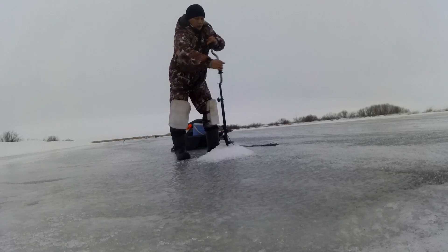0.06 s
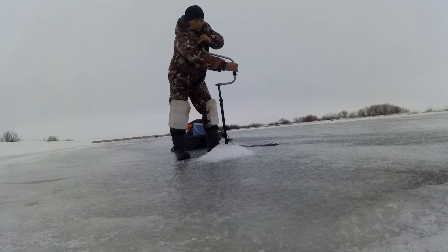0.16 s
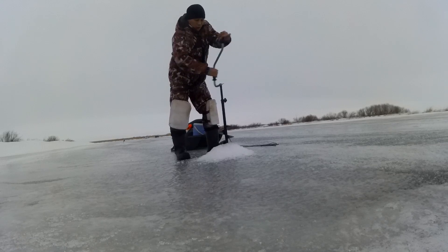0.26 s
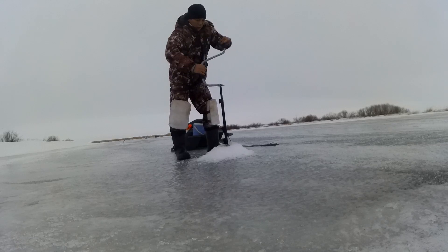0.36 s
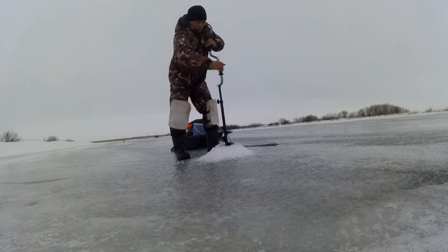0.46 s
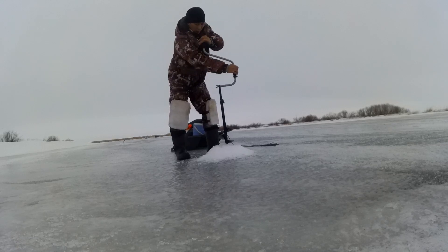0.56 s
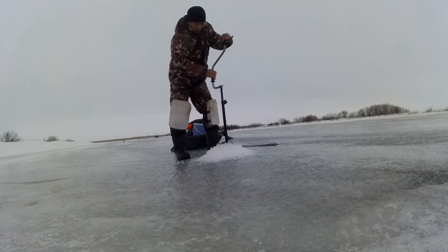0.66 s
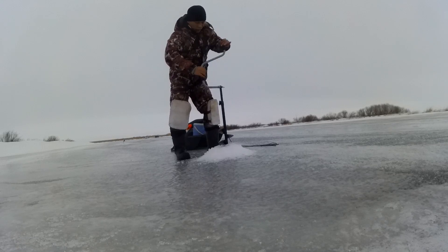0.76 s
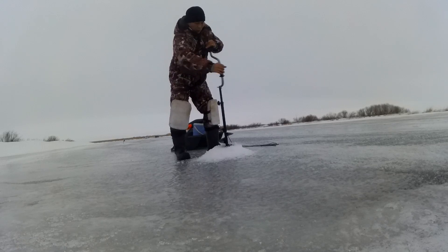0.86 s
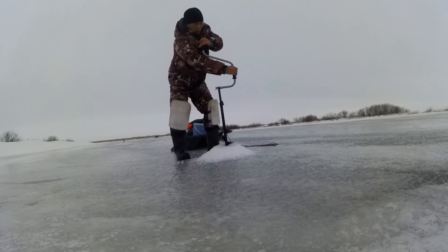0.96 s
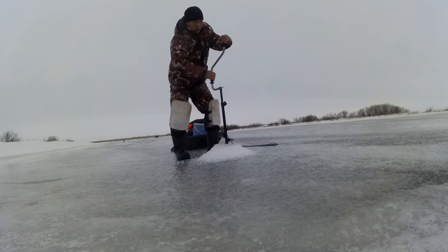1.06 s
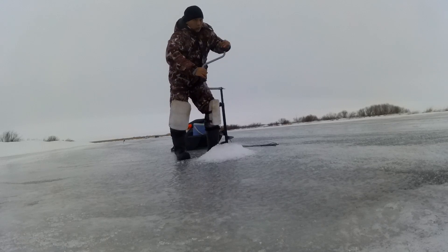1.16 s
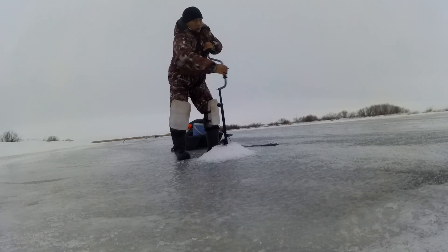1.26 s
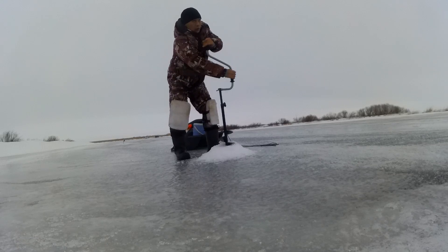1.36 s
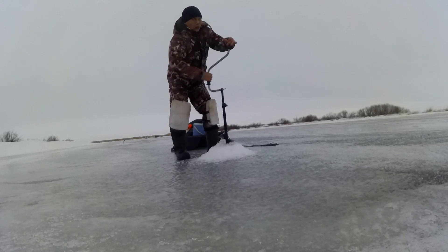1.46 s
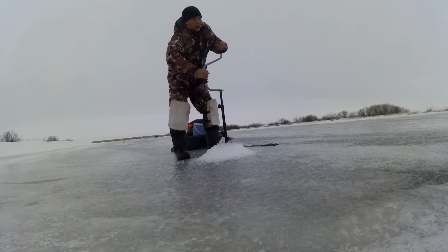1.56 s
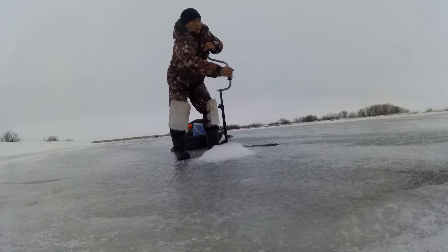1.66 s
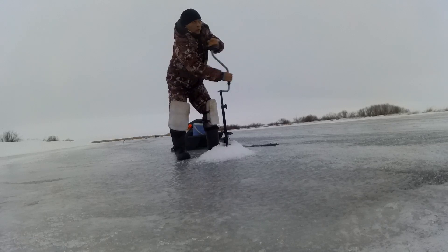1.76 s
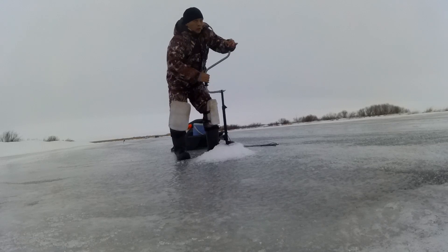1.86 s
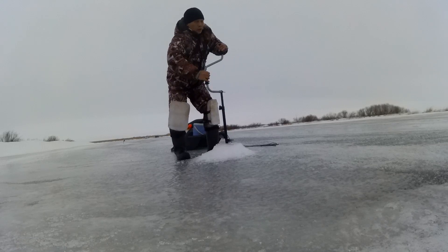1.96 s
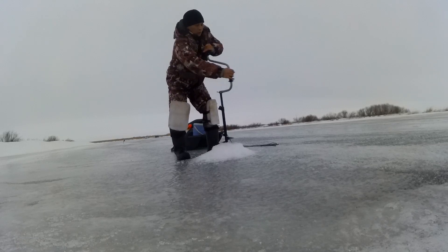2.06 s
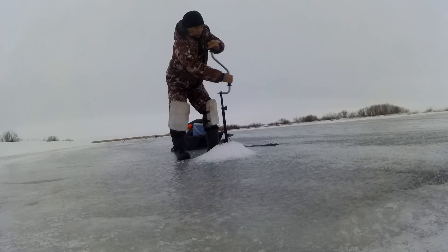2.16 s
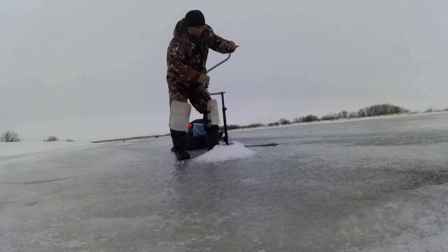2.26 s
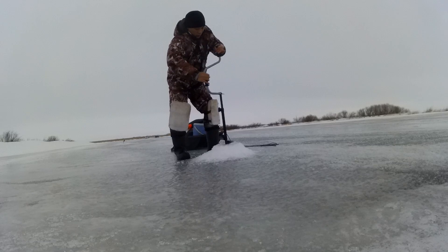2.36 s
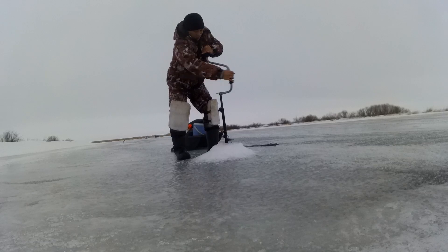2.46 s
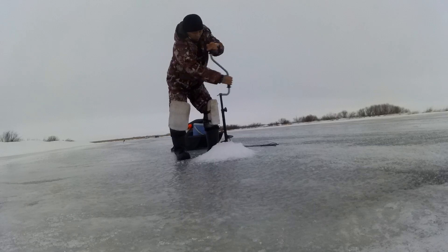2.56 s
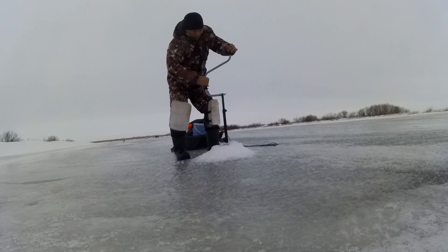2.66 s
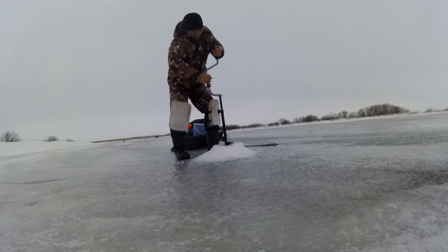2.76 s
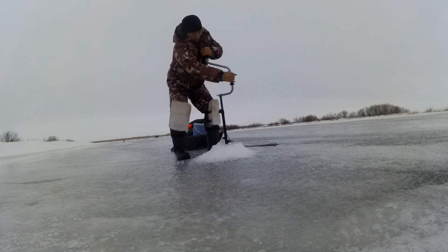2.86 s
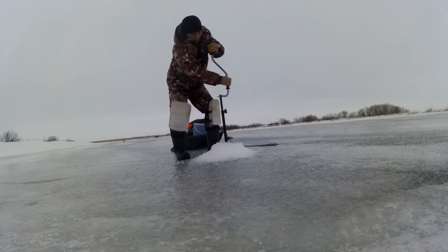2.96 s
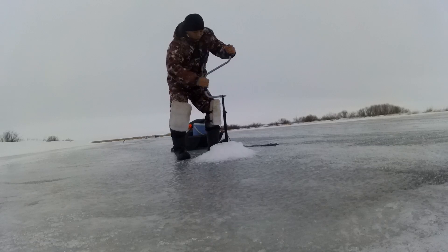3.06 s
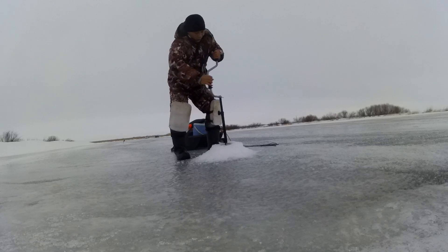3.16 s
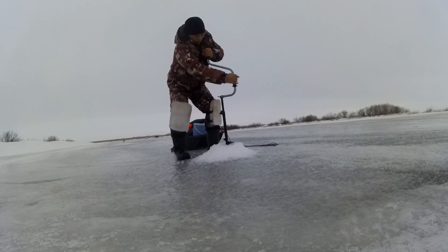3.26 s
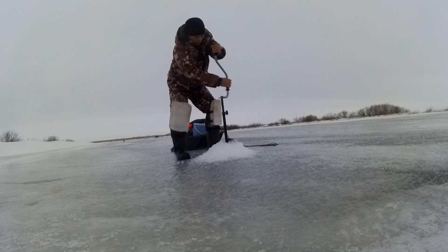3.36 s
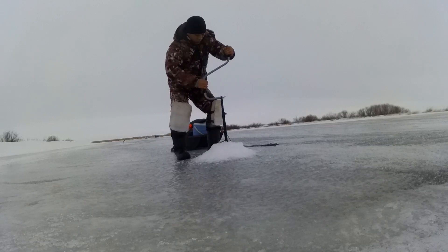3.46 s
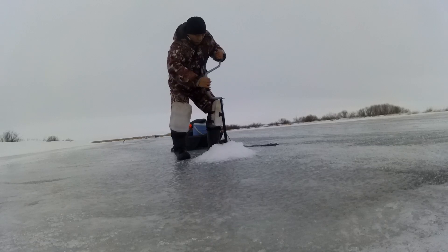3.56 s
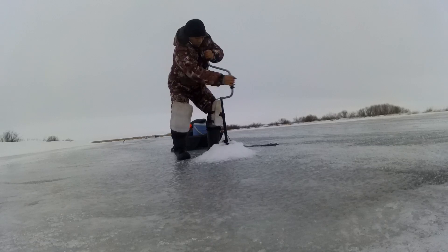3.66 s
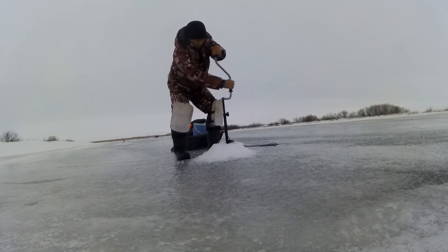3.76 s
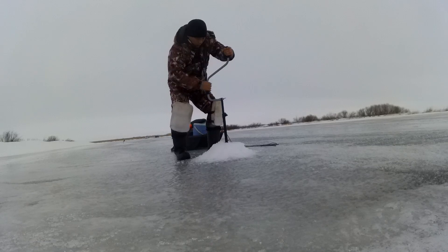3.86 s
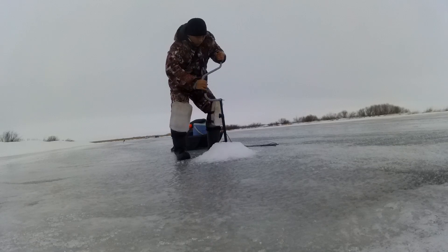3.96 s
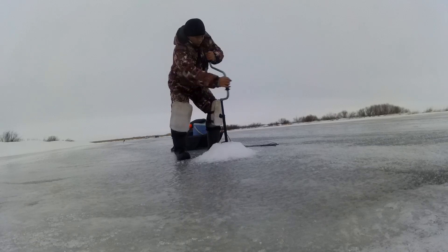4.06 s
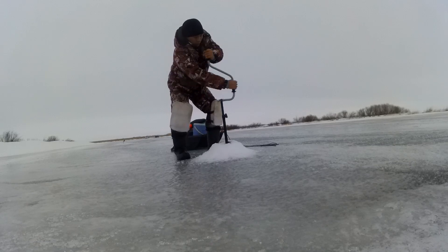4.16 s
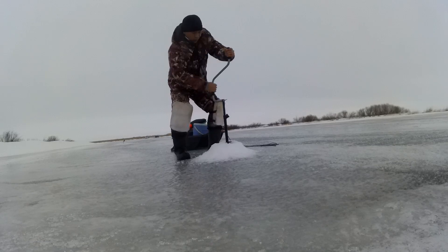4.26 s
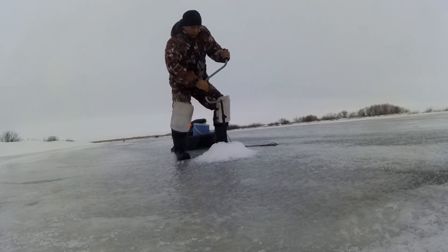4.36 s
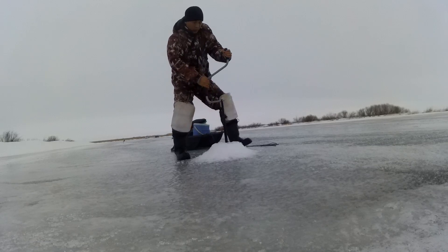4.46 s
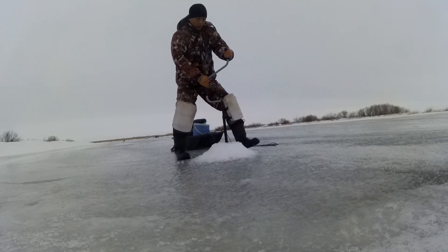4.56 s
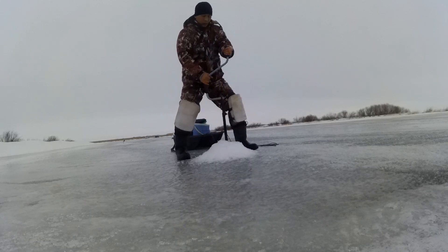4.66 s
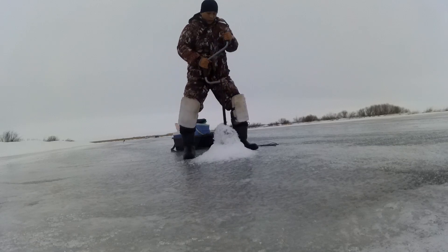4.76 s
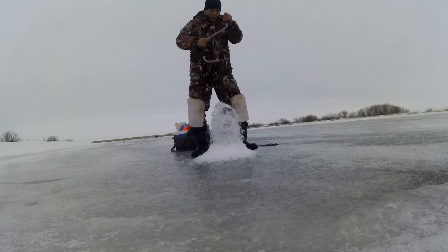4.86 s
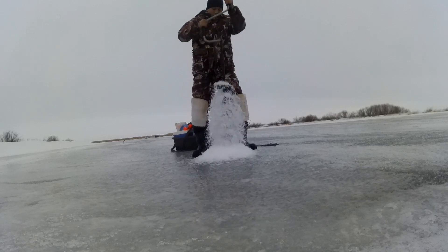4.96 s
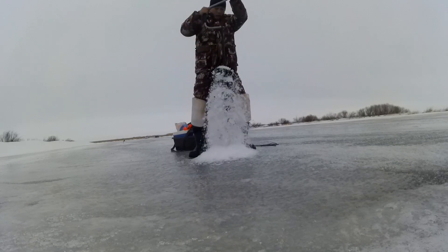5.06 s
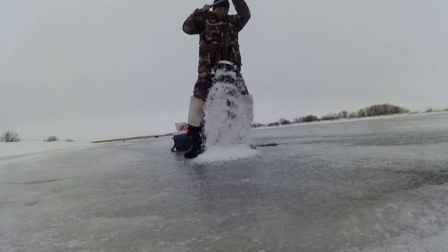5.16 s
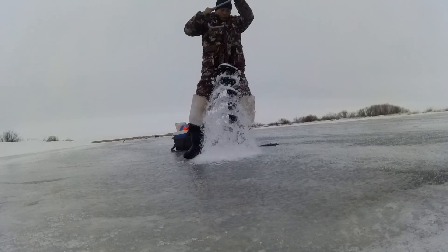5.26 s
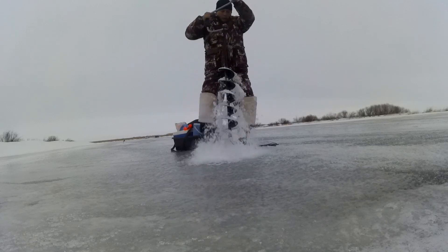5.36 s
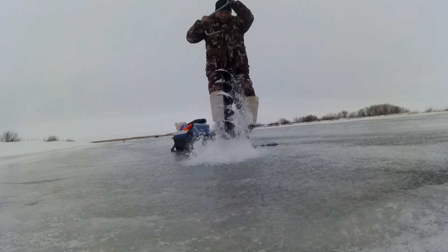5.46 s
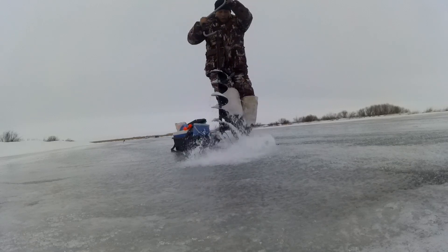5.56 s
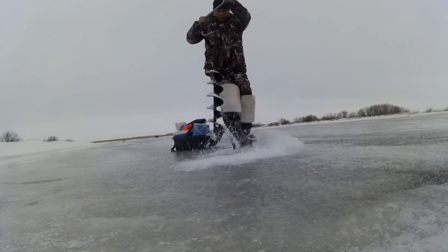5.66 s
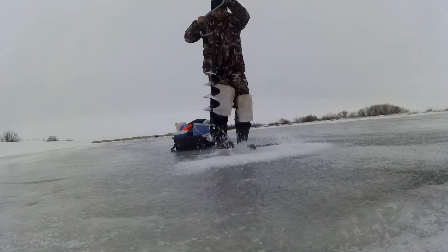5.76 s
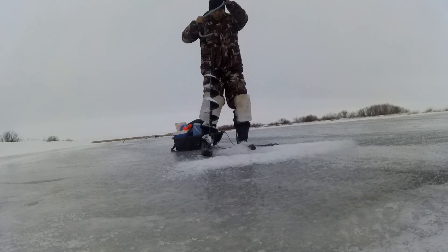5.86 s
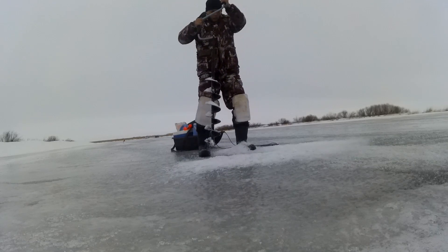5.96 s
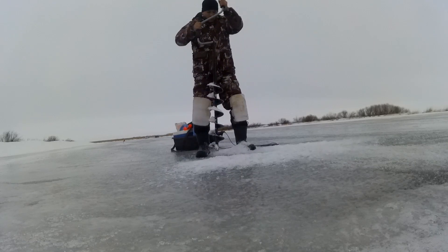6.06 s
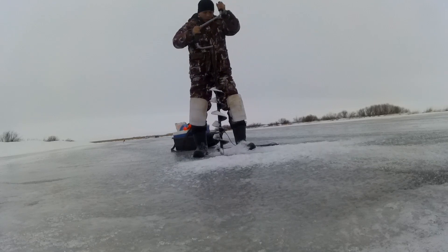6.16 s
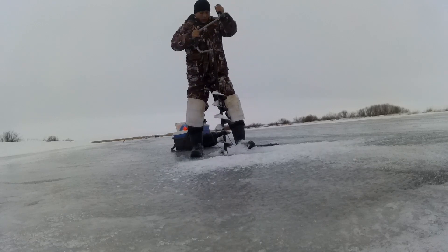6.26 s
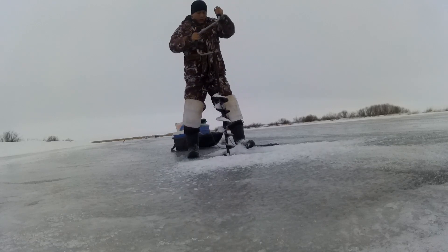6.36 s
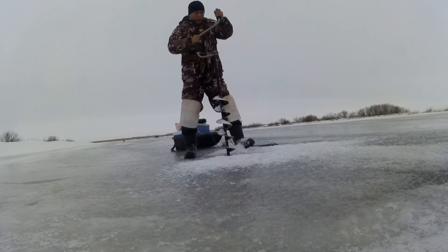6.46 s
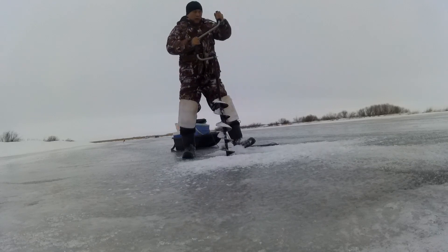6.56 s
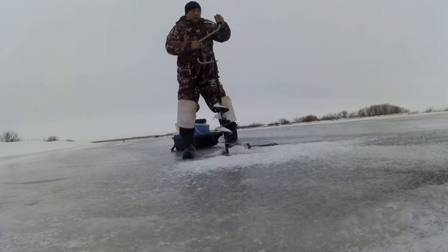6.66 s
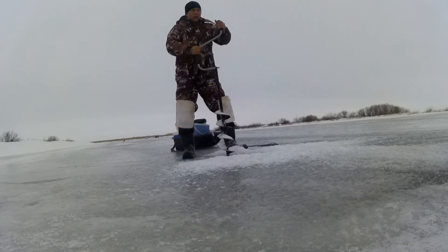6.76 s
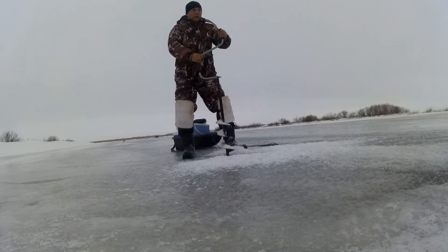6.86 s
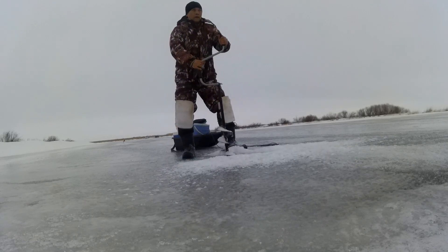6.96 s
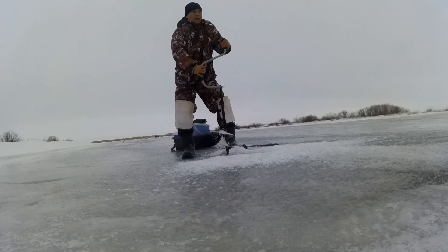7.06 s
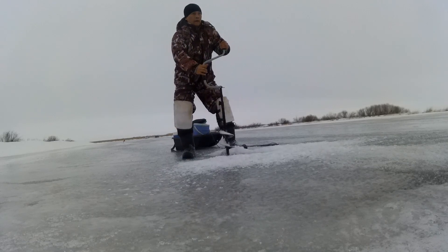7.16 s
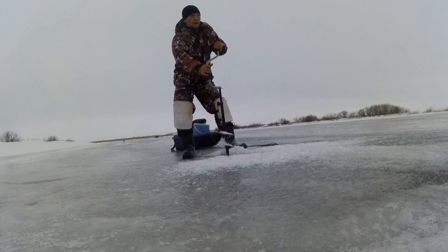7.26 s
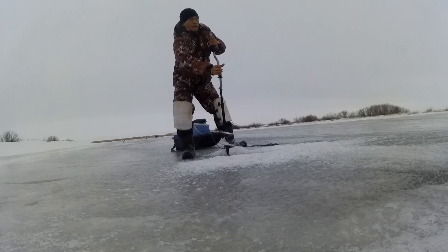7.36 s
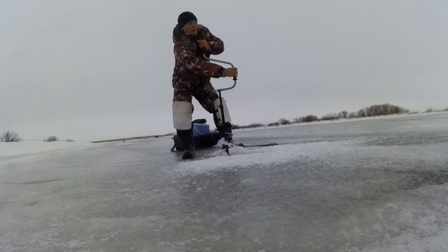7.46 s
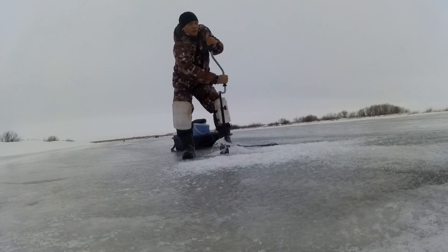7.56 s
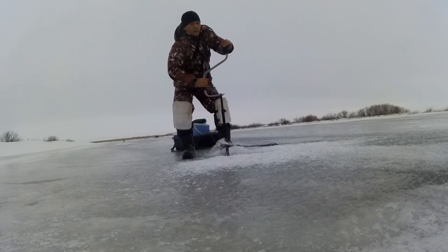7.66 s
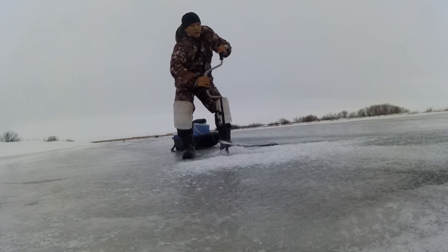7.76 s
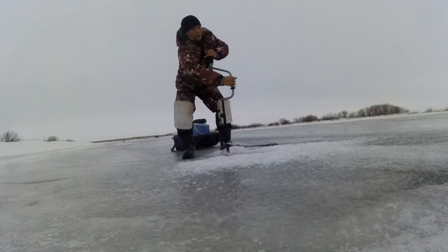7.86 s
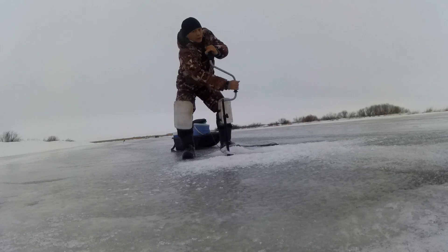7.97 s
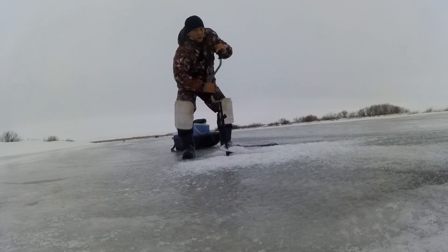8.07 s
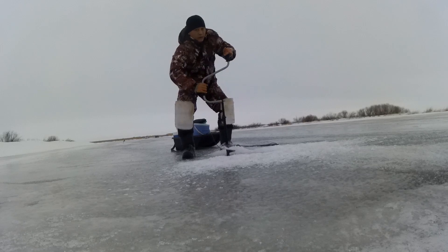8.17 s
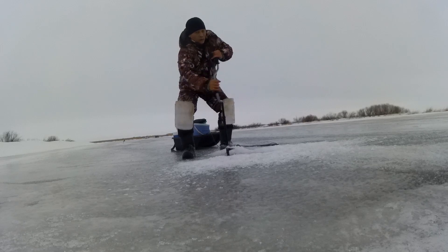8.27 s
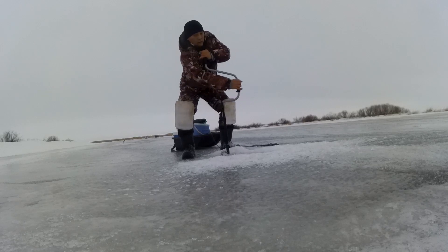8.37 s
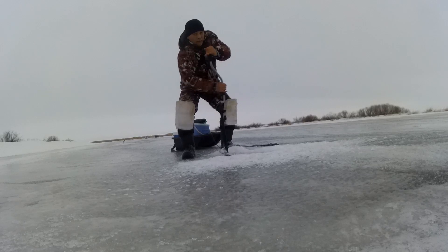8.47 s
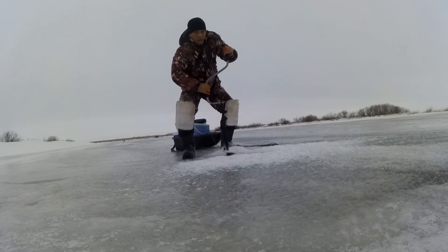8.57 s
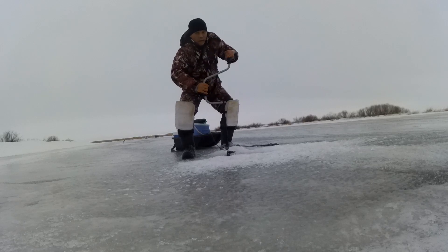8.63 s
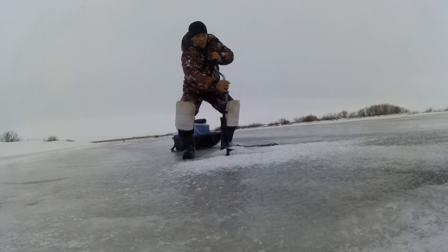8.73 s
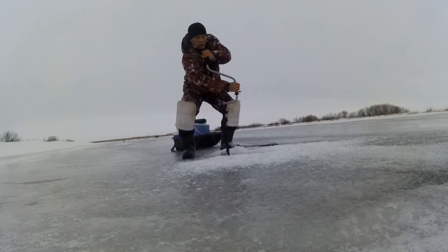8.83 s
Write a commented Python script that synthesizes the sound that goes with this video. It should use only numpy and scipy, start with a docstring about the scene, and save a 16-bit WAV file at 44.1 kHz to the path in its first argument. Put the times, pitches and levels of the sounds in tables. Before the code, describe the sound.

The microphone lies on a frozen lake, so the ice carries most of the sound. From 0 to 4.4 s a hand auger grinds steadily: a dull, wavering ring around 530 Hz, low rumble and gritty crunch, swelling with each push roughly every 0.4 s, broken by irregular bites, with faint crackling chips and a few tiny early squeaks. It stops abruptly; a soft knock, then at 4.7 s a sharper knock and tick, and a rasping drag up the hole until 5 s. From 5.2 to 5.7 s slush drops in wet lumps, hollow thuds and fine fizz, thinning to crumbs and drips. Around 6.7 s a boot thuds and crunches. At 6.95 s blades skid with a brief metallic chatter. Sparse scratches follow from 7.4 s; a short rising squeal at 8.2 s, then ringing, biting grinding builds strongly to the end, about 8.9 s.

```python
"""A hand auger grinds through lake ice, dull and ringing near 530 Hz, because the microphone lies on the sheet.
It is pulled out and sheds its slush; a boot shifts, the blades are set down, skid and bite again.
Brittle clicks driven through resonances and colour filters make the cutting and scraping;
short waves and noise pulses make the knocks, bites and splinters.
Only a faint crackle of chips and spray comes through the air."""
import sys
import numpy as np
from scipy import signal
from scipy.fft import rfft, irfft
from scipy.io import wavfile
from scipy.ndimage import uniform_filter1d, map_coordinates

SR = 44100
rng = np.random.default_rng(int(sys.argv[2]) if len(sys.argv) > 2 else 0)


def generate_wav(signal):
    """Clip the signal to [-1, 1] and save it as 16-bit WAV at the path in sys.argv[1]."""
    frames = np.transpose(np.atleast_2d(signal))
    scaled = np.clip(frames, -1, 1) * 32767
    pcm = np.round(scaled).astype(np.int16)
    wavfile.write(sys.argv[1], SR, pcm)


N = 392445

# ice chips crackling in the air: [f/Hz, level/dB]
CHIP_COLOUR = [(1800, 1), (2300, 0), (2900, -4), (3500, -3.5), (4500, -1), (5050, -7.5), (5400, -0.5),
               (6300, -3), (6750, -10.5), (7250, -6), (8300, -20), (14000, -19.5)]
# wet crust breaking: [f/Hz, level/dB]
CRUST_COLOUR = [(800, -12.5), (1120, -5.5), (1280, 5.5), (1450, -3.5), (1700, -1.5), (1900, -12),
                (2160, -29.5), (5000, -40), (6500, -61)]
# the steel catches and breaks off a larger flake: [t/s of the peak, level/dB, rise/s, ring f/Hz, crunch level/dB]
BITES = [(.027, -25, 0.0037, 537, -43), (.144, -18, 0.0059, 532, -41.5), (.28, -26.5, 0.0077, 537, -45),
         (.337, -22, .003, 523, -46), (.517, -24.5, 0.0067, 528, -53), (.55, -24, 0.0033, 525, -51),
         (.725, -21.5, 0.0044, 522, -49), (.929, -20, 0.0023, 560, -44), (1.159, -22, 0.0044, 536, -54),
         (1.328, -24.5, 0.0025, 557, -46), (1.415, -24, 0.0044, 553, -38), (1.456, -21.5, .0025, 544, -45),
         (1.5, -25.5, 0.007, 534, -44), (1.606, -29, 0.0028, 534, -40), (1.69, -24, 0.0017, 563, -48),
         (1.977, -19.5, 0.0038, 535, -49), (1.732, -20, 0.00089, 510, -49),
         (1.820, -20.5, 0.0017, 560, -42.5), (2.072, -27, 0.0025, 550, -42.5),
         (2.271, -21, .0045, 543, -49), (2.443, -22, .002, 567, -45), (2.525, -28, 0.0029, 523, -42),
         (2.550, -19.5, 0.002, 550, -41), (2.630, -22, 0.002, 560, -39), (2.589, -19, .003, 560, -48),
         (2.756, -17, 0.0017, 530, -51), (2.877, -19.5, 0.0013, 483, -40.5),
         (3.074, -18.5, 0.0043, 526, -52), (3.109, -24, 0.0037, 535, -53), (3.197, -20.5, 0.0026, 536, -46),
         (3.268, -22, 0.0074, 552, -41), (3.289, -17.5, .0045, 534, -50), (3.677, -19.5, 0.0015, 520, -43),
         (3.857, -20, 0.0019, 540, -45), (3.869, -17, 0.0058, 534, -46), (3.904, -19.5, 0.0016, 516, -51),
         (4.113, -21.5, 0.004, 536, -47), (4.256, -20, 0.0024, 510, -52), (4.301, -17, 0.0021, 531, -42),
         (4.755, -31, 0.001, 616, -61), (4.768, -32, 0.0028, 482, -58), (4.799, -29, 0.0011, 601, -55),
         (4.815, -26, 0.00067, 559, -46), (4.833, -28, 0.0022, 603, -43), (4.844, -26.5, 0.00066, 624, -43),
         (4.854, -26, 0.0014, 620, -40), (4.864, -35, 0.0012, 585, -36), (4.885, -17, 0.0017, 556, -35),
         (4.890, -20.5, 0.0017, 700, -32), (4.898, -18.5, 0.00093, 624, -34),
         (4.909, -25, 0.0015, 671, -45), (4.952, -24.5, 0.002, 574, -35.5),
         (6.933, -31.5, 0.0055, 554, -61), (6.963, -24, 0.0038, 540, -35.5), (6.985, -26, 0.0015, 573, -40),
         (7.009, -24, 0.0017, 584, -38), (7.033, -23.5, 0.0037, 554, -46),
         (7.064, -23.5, 0.0016, 556, -45.5), (7.080, -26, 0.0043, 526, -58), (7.107, -39, 0.0024, 581, -61),
         (7.126, -38, 0.0027, 592, -59), (7.152, -35.5, 0.0016, 620, -57), (7.618, -24.5, 0.0039, 502, -53),
         (8.021, -22, 0.00076, 573, -53), (8.060, -25, 0.0024, 506, -48), (8.145, -25.5, 0.0032, 520, -49),
         (8.196, -27, 0.0023, 553, -38), (8.212, -21, 0.0024, 547, -45), (8.231, -15.5, 0.0039, 512, -46),
         (8.339, -20.5, 0.006, 528, -38), (8.394, -17, 0.01, 522, -41), (8.424, -17.5, 0.005, 557, -37.5),
         (8.470, -16, 0.0032, 545, -39), (8.506, -18.5, 0.004, 508, -46), (8.544, -20, .002, 537, -43),
         (8.562, -12.5, 0.0026, 555, -40.5), (8.583, -17, 0.0024, 560, -43),
         (8.654, -13.5, 0.0042, 545, -45), (8.775, -17, 0.0042, 562, -40), (8.755, -21.5, .002, 540, -42),
         (8.805, -15.5, 0.0014, 525, -42), (8.874, -17.5, .003, 590, -37)]


def amp(db):
    """Decibels to gain."""
    return 10 ** (np.asarray(db) / 20)


def unit(x):
    """Scale to rms 1."""
    return x / np.sqrt(np.mean(x ** 2))


def even(x, span_s=0.11):
    """Rms 1 over every short stretch; the fine grain stays."""
    power = uniform_filter1d(x ** 2, int(span_s * SR) + 1)
    return x / np.sqrt(power + 1e-12 * np.mean(x ** 2))


def gains(table):
    """One gain curve for each dB column, fading to silence within 20 ms outside the table's span."""
    s, *columns = np.transpose(table)
    t = np.arange(N) / SR
    gate = np.clip(np.minimum(t - s[0], s[-1] - t) / .02 + 1, 0, 1)
    return [gate * amp(np.interp(t, s, c)) for c in columns]


def hump(s, half_s):
    """Bell-shaped gain round time s."""
    return np.exp(-((np.arange(N) / SR - s) / half_s) ** 2)


def swell(start_s, attack_s, hold_s, release_s, db):
    """Gain that climbs 30 dB to its level, holds, and sinks 30 dB in each release time."""
    t = np.arange(N) / SR - start_s
    below = np.maximum(1 - t / attack_s, 0) + np.maximum(t - attack_s - hold_s, 0) / release_s
    return amp(db - 30 * below)


def colour(x, points, size=4096):
    """Causal minimum-phase filter with the given (Hz, dB) outline, falling away steeply beyond its ends."""
    hz, db = np.transpose(points)
    f = np.maximum(np.fft.rfftfreq(size, 1 / SR), 1)
    outline = np.interp(np.log(f), np.log(hz), db)
    octaves_beyond = np.maximum(np.log2(hz[0] / f), 0) + np.maximum(np.log2(f / hz[-1]), 0)
    cepstrum = irfft(np.log(amp(outline - np.minimum(24 * octaves_beyond, 60))))
    # fold the cepstrum forward in time, so that nothing sounds early
    cepstrum[1:size // 2] *= 2
    cepstrum[size // 2 + 1:] = 0
    response = irfft(np.exp(rfft(cepstrum)))
    return signal.fftconvolve(x, response)[:len(x)]


def resonate(x, modes):
    """Sum of (Hz, width Hz, dB) resonances; neighbours swing in opposite phase."""
    out = 0
    for k, (hz, width_hz, db) in enumerate(modes):
        b, a = signal.iirpeak(hz, hz / width_hz, fs=SR)
        out = out + (-1) ** k * amp(db) * signal.lfilter(b, a, x)
    return out


def band(x, lo_hz, hi_hz, order=3):
    """Band-pass."""
    return signal.sosfilt(signal.butter(order, [lo_hz, hi_hz], "band", fs=SR, output="sos"), x)


def walk(rate):
    """Random wander with spread near 1, in straight lines between `rate` points a second."""
    steps = rng.standard_normal(size=4096)
    return 1.2 * np.interp(np.arange(N) / SR * rate, np.arange(len(steps)), steps)


def cracks(rate, spread_db):
    """Brittle fractures: clicks of either sign at random moments, `rate` a second, of random strength."""
    happens = rng.random(N) < rate / SR
    sign = rng.choice([-1, 1], N)
    strength = amp(spread_db * np.clip(rng.standard_normal(N), -2, 2))
    return unit(happens * sign * strength)


def shifting(x, depth_db, rate, lo_hz, hi_hz, count=12):
    """Pieces of ice differ in size: neighbouring bands swell and fade on their own."""
    f = np.fft.rfftfreq(N, 1 / SR)
    place = np.interp(f, [lo_hz, hi_hz], [0, count - 1])
    spectrum = rfft(x)
    out = np.zeros(N)
    for k in range(count):
        one_band = irfft(spectrum * np.maximum(1 - np.abs(place - k), 0), N)
        out += one_band * amp(depth_db * walk(rate))
    return out


def wavering(x, share, rate):
    """The pitch of a ring wanders as the load on the blades changes: it is read at an uneven speed."""
    return map_coordinates(x, [np.cumsum(1 + share * walk(rate))], order=1, mode="mirror")


def scrape(gain, outline, rate, spread_db, judder_db):
    """Gritty contact in fits and starts, coloured by what it rubs."""
    grit = cracks(rate, spread_db) * amp(judder_db * walk(90))
    return gain * even(colour(grit, outline), span_s=0.05)


def add(out, s, sound, db):
    """Mix a sound in at time s with the given peak level."""
    i = max(int(s * SR), 0)
    part = sound[:max(N - i, 0)]
    out[i:i + len(part)] += amp(db) * part / np.abs(sound).max()


def lake_air(level_db=-58.5):
    """Still air over the lake and microphone hiss: coloured steady noise."""
    # [f/Hz, level/dB]
    air_colour = [(12, -18.5), (20, -7), (70, -18.5), (286, -30), (328, -29), (841, -37.5), (1930, -44),
                  (2100, -45.5), (2280, -45.5), (2690, -46.5), (5850, -47), (7100, -49), (15000, -54)]
    return amp(level_db) * unit(colour(rng.standard_normal(N), air_colour))


def splinters(splinter_db=-2.0, spread=1.32):
    """Small hard pieces of ice land, snap and ring briefly as decaying sines."""
    # each splinter has its own pitch: [t/s, f/Hz, t60/s, level/dB]
    snaps = [(5.3625, 1300, .006, -46), (5.439, 1600, 0.0034, -43), (5.449, 1450, .006, -43),
             (5.492, 1700, 0.005, -43), (5.511, 1050, .006, -41), (5.517, 1350, .008, -45),
             (5.567, 1320, .012, -55), (5.586, 7400, .015, -56), (5.986, 1510, .005, -47),
             (6.044, 1610, .003, -43), (6.278, 1700, .005, -51), (6.333, 1830, .025, -54),
             (6.386, 1000, .005, -50), (6.422, 1310, .04, -53), (6.505, 1830, .012, -48),
             (6.514, 1310, .025, -52), (6.557, 1310, 0.33, -60), (7.386, 1650, .004, -51),
             (7.437, 1500, .005, -55)]
    out, t = np.zeros(N), np.arange(SR // 4) / SR
    for s, hz, t60, db in snaps:
        ring = amp(-60 * t / t60) * np.sin(2 * np.pi * hz * t)
        add(out, s, band(ring, hz / spread, hz * spread), db + splinter_db)
    return out


def boots():
    """A sole treads on the sheet and crunches the wet crust, with short scuffs before it."""
    # a boot comes down, then grinds the crust: [t/s, tread level/dB, crunch level/dB]
    steps = [(6.645, -62, -72), (6.662, -45.5, -52), (6.682, -47, -59), (6.69, -39.5, -54),
             (6.703, -41, -51), (6.71, -39, -44), (6.73, -39, -44), (6.745, -45, -55), (6.763, -45, -55),
             (6.778, -53, -60), (6.805, -56, -52), (6.82, -54, -61), (6.847, -49, -53.5), (6.87, -63, -68),
             (6.92, -58, -61)]
    # the tread through the sheet: [f/Hz, level/dB]
    tread_colour = [(41, -52), (70, -20), (177, 0), (253, -5), (375, 1.5), (450, 1.5), (556, 4.5),
                    (869, -8), (1050, -11), (1400, -38)]
    # short scuffs on the crust: [t/s, half length/s, level/dB]
    scuff_times = [(4.998, 0.013, -53), (5.109, .014, -60), (5.985, 0.022, -64), (6.167, .018, -62),
                   (6.277, .005, -68), (6.424, 0.0087, -62), (6.512, 0.018, -57.5)]
    tread, crunch = gains(steps)
    scuffs = sum(amp(db) * hump(s, half_s) for s, half_s, db in scuff_times)
    return (scrape(tread, tread_colour, rate=1400, spread_db=1, judder_db=1)
            + scrape(crunch + scuffs, CRUST_COLOUR, rate=1300, spread_db=2.0, judder_db=3.5))


def slush():
    """Wet lumps rush onto the ice while fine drops fizz; crumbs and drips keep falling afterwards."""
    # slush falls from the spiral onto the ice: [t/s, level/dB] and [f/Hz, level/dB]
    slush_fall = [(5.35, -69), (5.37, -48), (5.45, -42.5), (5.53, -42.5), (5.59, -44), (5.65, -56),
                  (5.72, -66)]
    slush_colour = [(41, -35), (70, -4), (97, 2), (186, -8), (258, -9), (455, 0.5), (653, -0.5), (850, -21),
                    (980, -10), (1130, -26), (1280, -14), (1750, -27), (2120, -44), (3000, -49),
                    (3900, -80), (6600, -120)]
    # crumbs and drips from the lifted auger, thickest with the slush: [t/s, level/dB] and [f/Hz, level/dB]
    crumb_fall = [(5.05, -60), (5.31, -62.5), (5.42, -48), (5.7, -62), (6.3, -63.5), (6.62, -61.5)]
    crumb_colour = [(120, -6), (330, -1.5), (560, 10), (750, 1), (1100, -18), (1300, -2.5), (1750, -4.5),
                    (2200, -25), (3000, -27)]
    # showers of fine spray and trickling water: [start t/s, attack/s, hold/s, release/s, level/dB]
    showers = [(5.05, .37, .12, 1.7, -67), (6.8, .03, .025, .16, -70)]
    # their colour: [f/Hz, level/dB]
    spray_colour = [(2500, -6.5), (3000, -16), (3720, -1.5), (4040, -8.5), (4520, -1), (4900, -17.5),
                    (5350, -3.5), (5620, -11), (5900, -10.5), (6480, -5), (6750, -13.5), (7300, -11.5),
                    (10500, -21), (12800, -11), (15000, -15.5)]
    # a narrow sizzle as the slush spreads over the ice: [t/s, level/dB]
    sizzle_path = [(5.35, -85), (5.52, -81), (5.9, -75), (6.15, -81), (6.45, -97)]
    lumps = scrape(gains(slush_fall)[0], slush_colour, rate=600, spread_db=3, judder_db=5.0)
    # the pitch of the patter shifts from crumb to crumb
    patter = shifting(cracks(800, spread_db=0.5), depth_db=2, rate=27, lo_hz=300, hi_hz=2000, count=8)
    crumbs = gains(crumb_fall)[0] * even(colour(patter, crumb_colour), span_s=0.15)
    shower_gain = sum(swell(*shower) for shower in showers)
    spray = scrape(shower_gain, spray_colour, rate=1600, spread_db=-1.5, judder_db=1)
    drops = amp(1.5 * walk(25)) * spray
    sizzle = gains(sizzle_path)[0] * unit(band(cracks(3000, spread_db=5), 5400, 5820))
    return lumps + amp(1.5) * crumbs + amp(1.0) * drops + amp(-1.0) * sizzle


def knocks(width_hz=260, ring_db=1, knock_db=-2, clack_db=-1, lag_s=0.00236, size=4096):
    """Short blows through the sheet; bending waves carry the treble ahead of the bass; hard things add a clack."""
    # lumps of ice, boots and steel strike the sheet: [t/s, level/dB, ring f/Hz, hardness/dB]
    blows = [(4.44, -43, 520, -7), (4.706, -31.5, 393, -9), (5.075, -35.5, 492, -16),
             (5.092, -37, 495, -14), (5.109, -41, 567, -5), (5.117, -39, 530, -14), (5.2, -31.5, 560, -28),
             (5.2363, -26, 593, -11.5), (5.274, -40.5, 480, -12), (5.313, -36, 536, -25),
             (5.361, -39, 597, -10), (5.373, -34, 580, -14), (5.466, -36, 540, -18), (5.536, -38, 470, -20),
             (5.568, -36, 560, -20), (5.391, -29, 650, -9), (5.4024, -22.5, 580, -22),
             (5.407, -28, 576, -26), (5.421, -41, 567, -20), (5.4361, -23.5, 606, -15),
             (5.445, -35, 606, -16), (5.450, -29, 560, -20), (5.494, -22, 537, -15), (5.556, -44, 477, -18),
             (5.574, -29, 504, -25), (5.587, -34, 546, -30), (5.597, -32, 540, -25),
             (5.635, -29.5, 540, -30), (5.664, -39, 530, -22), (5.674, -35, 540, -27),
             (5.786, -44, 563, -12), (5.966, -37, 464, -24), (5.977, -42, 560, -10), (5.998, -43, 420, -20),
             (6.110, -35.5, 587, -11), (6.117, -34, 550, -10), (6.159, -41, 522, -14),
             (6.303, -38.5, 564, -1), (6.129, -44, 560, -14), (6.554, -36, 565, -4), (6.587, -43, 560, -13),
             (6.629, -49, 400, -16), (6.687, -36, 480, -24), (6.704, -30, 556, -3), (6.719, -39, 450, -9),
             (6.756, -40, 520, -16)]
    # the thud, then the clack of a hard knock: [f/Hz, level/dB]
    thud_colour = [(80, -13), (350, -5.5), (600, 1.5), (950, -19), (1650, -22), (2100, -52), (3000, -63)]
    clack_colour = [(700, -4), (1000, 1), (1150, -4), (1270, 7), (1800, -7), (2150, -26), (2900, -26),
                    (4500, -31), (9000, -52)]
    out, f = np.zeros(N), np.fft.rfftfreq(size, 1 / SR)
    for s, db, hz, hard_db in blows:
        # the delay falls with the root of frequency and is lag_s at the ring pitch
        wave = irfft(np.exp(-2j * np.pi * 2 * lag_s * np.sqrt(hz * f)))
        thud = colour(wave, thud_colour)
        add(out, s, thud + resonate(thud, [(hz, width_hz, ring_db)]), db + knock_db)
        add(out, s, colour(wave, clack_colour), db + hard_db + clack_db)
    return out


def pull_out(steel_db=-37.0, jerk_db=-50, jerk_t60=0.1, jerk_s=4.690, free_s=4.982):
    """The spiral jerks loose with a crisp tick, rasps up the wall of the hole and rings as it comes free."""
    # the tick as it jerks loose: [f/Hz, level/dB]
    jerk_colour = [(400, -8), (1500, 0), (2600, 2), (3200, -4), (4500, -8), (5500, -22)]
    # the spiral ringing freely: [f/Hz, t60/s, level/dB]
    free_steel = [(256, .35, -16), (400, .22, 0)]
    # the drag up the hole: [t/s, level through the ice/dB, level of the steel's rasp/dB]
    drag_path = [(4.66, -78, -90), (4.714, -50.5, -79), (4.79, -45.5, -65), (4.85, -35.5, -61),
                 (4.892, -34.5, -56.5), (4.92, -44, -67), (4.948, -35, -53), (4.972, -48.5, -72),
                 (4.995, -52, -62), (5.05, -66, -88)]
    # the drag through the ice: [f/Hz, level/dB]
    drag_colour = [(41, -38), (70, -5), (104, -12.5), (154, -22.5), (248, -8.5), (340, -15), (558, 1.5),
                   (740, -5.5), (1060, -30), (1260, -21), (1390, -20), (1680, -20.5), (2080, -37.5),
                   (6200, -43.5), (10000, -75), (13000, -99), (22000, -120)]
    # the spiral rings as it rasps on the wall: [f/Hz, width/Hz, level/dB]
    wall_ring = [(3260, 120, 1), (3710, 80, 3), (4080, 130, 1), (4600, 150, -0.5), (5440, 260, -4),
                 (6320, 130, 3)]
    out, t = np.zeros(N), np.arange(SR) / SR
    tick = rng.standard_normal(SR) * amp(-60 * t / jerk_t60)
    add(out, jerk_s, colour(tick, jerk_colour), jerk_db)
    ring = sum(amp(db - 60 * t / t60) * np.sin(2 * np.pi * hz * t) for hz, t60, db in free_steel)
    add(out, free_s, ring, steel_db)
    rasp = cracks(3000, spread_db=1.0) * amp(4.4 * walk(80))
    rasp = shifting(rasp, depth_db=1.5, rate=51, lo_hz=400, hi_hz=6900, count=16)
    wall = even(colour(rasp, drag_colour), span_s=0.026)
    singing = even(band(resonate(rasp, wall_ring), 2700, 6100), span_s=0.023)
    chips = even(colour(rasp, CHIP_COLOUR), span_s=.02)
    steel = amp(-1.0) * singing + amp(-8.0) * chips
    drag, sing = gains(drag_path)
    return out + amp(3.0) * drag * wall + sing * steel


def skid():
    """The blades chatter over hard ice before they find a grip: bursts of clicks ring ice and steel."""
    # the skid on bare ice: [t/s, level through the ice/dB, level of the singing steel/dB]
    skid_path = [(6.94, -52, -73), (6.953, -39, -56), (6.968, -29.5, -51), (7.02, -32.5, -57),
                 (7.05, -35.5, -69), (7.07, -34.5, -62), (7.09, -54, -88), (7.12, -65, -78)]
    # the skid through the ice: [f/Hz, level/dB]
    skid_colour = [(70, -23), (120, -10), (300, -20), (470, -3), (550, 4), (650, -1.5), (760, 1.5),
                   (880, -11), (1150, -11), (1400, -18), (1600, -7), (1780, -23), (1920, -14), (2080, -42),
                   (3000, -34), (7000, -52), (13000, -49)]
    # the steel sings as it skids: [f/Hz, width/Hz, level/dB]
    skid_ring = [(3220, 130, 0.5), (4280, 110, 4.5), (4430, 140, -4), (4550, 80, 5), (6430, 200, 9.5),
                 (6460, 210, 7), (9300, 250, -19)]
    press, sing = gains(skid_path)
    chatter = cracks(5000, spread_db=3.5) * amp(1.7 * walk(110))
    ice = even(colour(chatter, skid_colour), span_s=0.022)
    steel = even(band(resonate(chatter, skid_ring), 2400, 12000), span_s=0.023)
    return amp(-0.5) * press * ice + amp(0.5) * sing * steel


def first_squeal(s=8.188, half_s=0.016, hz=1330, glide_hz_per_s=1500, waver=.03, db=-40):
    """A blade gives one short rising squeal as it first cuts in: a sine of unsteady pitch."""
    t = np.arange(N) / SR
    glide_hz = glide_hz_per_s * np.clip(t - s, -2 * half_s, 2 * half_s)
    pitch_hz = (hz + glide_hz) * (1 + waver * walk(200))
    return amp(db) * hump(s, half_s) * np.sin(2 * np.pi * np.cumsum(pitch_hz) / SR)


def squeaks(half_s=0.032):
    """On a few early pushes the steel sticks and slips in the cut and rings faintly."""
    # the squeaks: [t/s, level/dB]
    squeak_times = [(.665, -59.5), (1.06, -61.5), (1.45, -59.5)]
    # their ring: [f/Hz, width/Hz, level/dB]
    squeak_ring = [(3260, 50, 2.5), (3860, 64, -7), (6600, 200, -13)]
    ring = even(band(resonate(cracks(3000, spread_db=1.5), squeak_ring), 3300, 6800), span_s=.03)
    return ring * sum(amp(db) * hump(s, half_s) for s, db in squeak_times)


def bites(bite_db=0.0, crunch_db=0, splinter_db=-13, crunch_lasts=1.6):
    """A caught edge lets go: the sheet swells and dies, more slowly for a long flake, which crunches and splinters."""
    out, t = np.zeros(N), np.arange(-2048, 2048) / SR

    def pulse(rise_s):
        return np.exp(-(t / rise_s) ** 2 / np.pi)

    for s, db, rise_s, hz, flake_db in BITES:
        shards = rng.standard_normal(len(t)) * pulse(crunch_lasts * rise_s)
        add(out, s + t[0], pulse(rise_s) * np.sin(2 * np.pi * hz * t), db + bite_db)
        add(out, s + t[0], colour(shards, CRUST_COLOUR), flake_db + crunch_db)
        add(out, s + t[0], colour(shards, CHIP_COLOUR), flake_db + splinter_db)
    return out


def stalls(depth_db=-7, hold_s=0.0033, ahead_s=0.0032):
    """While a blade is caught, just before each bite, the cutting dips."""
    caught = np.zeros(N)
    t = np.linspace(-3, 3, int(6 * hold_s * SR))
    for s, *_ in BITES:
        add(caught, s - ahead_s - 3 * hold_s, np.exp(-t ** 2), 0)
    return amp(depth_db * caught.clip(0, 1))


def cranking(stop_db_per_s=400):
    """Gains of rumble, drag, ring, crunch and chips: they swell with push and weight and drift with depth."""
    # each arm pushes once a turn: [t/s, force (1 = usual)]
    pushes = [(-.05, 3.2), (.31, 0.94), (.69, 0.67), (1.13, 0.83), (1.49, 0.83), (1.84, 0.74), (2.23, 0.62),
              (2.62, 1.16), (3.01, 0.79), (3.41, 0.93), (3.84, 0.62), (4.2, 1), (4.6, 0.69)]
    # weight leant on the auger: [t/s, level/dB]
    weight_path = [(0, 3), (.35, -4.5), (.7, 2), (1.35, 3), (1.85, 4), (2.4, 1), (2.9, 1), (3.5, 0.1),
                   (4.4, -4.5)]
    # rows: rumble of the ice, drag of the spiral, ring of the sheet, crunch at the blades, chips in the air
    # [level/dB, fade with depth/(dB/s), swing with each push/dB, lag/s, share of the weight, stop t/s]
    parts = [(-37.5, -0.13, .5, -0.016, 0.1, 4.43), (-37.5, 0.25, 1.05, -0.11, 1, 4.41),
             (-33, -0.42, 0.5, 0.0051, 0.2, 4.402), (-45, 0.28, 0.5, 0.046, .05, 4.395),
             (-59.5, 0.4, 1.1, -0.0056, 0.15, 4.392)]
    t = np.arange(N) / SR
    times, force = np.transpose(pushes)
    phase = 2 * np.pi * np.interp(t, times, np.arange(len(times)))
    push = np.interp(t, times, force) * (1 + np.cos(phase)) - 1
    weight_db = np.interp(t, *np.transpose(weight_path))
    levels = []
    for db, fade, swing, lag, share, stop_s in parts:
        push_db = swing * np.interp(t - lag, t, push)
        stop_db = stop_db_per_s * np.maximum(t - stop_s, 0)
        levels.append(amp(db - fade * t + push_db + share * weight_db - stop_db))
    return levels


def peeling(levels, chips_share=.35, rumble_share=0.086):
    """Each thick shaving swells the crunch, and with it some of the chips and rumble."""
    # the blades dig in and peel a shaving: [t/s, half length/s, rise of the crunch/dB]
    shavings = [(.265, .03, 6), (.315, 0.031, 5), (0.387, 0.064, 4), (0.515, .02, 5.5), (0.667, 0.028, 6.5),
                (0.75, 0.04, 3), (0.813, 0.022, 6), (0.916, 0.016, 3), (1.1, .07, 3.5), (1.218, 0.019, 6),
                (1.314, 0.014, 5), (1.44, 0.032, 4.5), (1.533, 0.044, 3), (1.616, .025, 1.5),
                (1.7, 0.031, 3.5), (1.824, 0.048, 6), (1.994, 0.031, 2), (2.215, 0.034, 5),
                (2.29, .035, 3.5), (2.63, .025, 5), (2.683, 0.022, 4), (2.766, 0.027, 2),
                (2.89, 0.054, 2.5), (3.03, 0.099, 3.5), (3.417, 0.029, 5.5), (3.507, 0.036, 1.5),
                (3.686, 0.036, 2), (3.87, 0.028, 6.5)]
    rumble, drag, ring, crunch, chips = levels
    surge = amp(sum(db * hump(s, half_s) for s, half_s, db in shavings))
    return rumble * surge ** rumble_share, drag, ring, crunch * surge, chips * surge ** chips_share


def starting(rumble_db=-14.0, drag_db=-10.0, chips_db=-22, scratch_drag_db=-1.5, rumble_slope=0.79, drag_slope=0.98):
    """The same five gains in the new hole: a few scratches, then rumble, drag and ring follow the grip."""
    # the blades' grip comes and goes, then firms, with a short slackening near 8.7 s:
    # [t/s, grip level/dB, crunch level/dB]
    grip_path = [(6.84, -54, -77), (6.91, -51, -70), (7.1, -44, -51), (7.19, -54.5, -69), (7.3, -51.5, -69),
                 (7.53, -46.5, -64), (7.71, -51, -63.5), (7.79, -42, -57.5), (7.96, -47, -54.5),
                 (8.1, -41, -53), (8.145, -34.5, -39), (8.21, -27, -42), (8.33, -25.5, -41.5),
                 (8.42, -23.5, -40), (8.6, -20.5, -37), (8.68, -26, -41), (8.73, -28.5, -39),
                 (8.79, -22.5, -38), (8.9, -24.5, -37)]
    # before it firms, they scratch the surface: [t/s, half length/s, crunch level/dB, ring level/dB]
    scratches = [(7.392, 0.016, -67, -60), (7.465, 0.014, -69, -56), (7.542, 0.012, -54, -51),
                 (7.605, 0.023, -44.5, -36), (7.645, 0.029, -54, -35), (7.68, 0.018, -69, -41),
                 (7.759, 0.015, -58, -48), (7.829, .012, -51, -64), (7.877, 0.011, -54, -57),
                 (7.906, 0.007, -60, -63), (8.024, 0.038, -46, -42)]
    grip, shaving = gains(grip_path)
    full = grip.max()
    scratch = sum(amp(db) * hump(s, half_s) for s, half_s, db, _ in scratches)
    ring = grip + sum(amp(db) * hump(s, half_s) for s, half_s, _, db in scratches)
    rumble = amp(rumble_db) * full * (grip / full) ** rumble_slope + scratch
    drag = amp(drag_db) * full * (grip / full) ** drag_slope + amp(scratch_drag_db) * scratch
    crunch = shaving + scratch
    return rumble, drag, ring, crunch, amp(chips_db) * crunch


def drilling(levels, modes, outline, ring_db, spiral_db, rumble_db, crunch_db, chips_db):
    """The blades shave the ice in uneven spurts; fractures drive sheet and spiral, and chips crackle in the air."""
    # resonance of the steel spiral while it is in the hole: [f/Hz, width/Hz, level/dB]
    spiral_modes = [(400.7, 24, 0)]
    # low rumble of the cutting: [f/Hz, level/dB]
    rumble_colour = [(26, -46), (45, -16), (92, 3.5), (230, -1), (310, 1), (360, -3.5), (440, -23),
                     (750, -120)]
    # the blades ring: [f/Hz, width/Hz, level/dB]
    blade_modes = [(2600, 130, -4.5), (3240, 67, 1), (3710, 90, 2), (3905, 90, -1), (4550, 160, -7.5),
                   (5600, 130, -3), (6200, 170, -1)]
    rumble, drag, ring, crunch, chips = levels
    spurts = amp(0.68 * walk(70))
    cutting = cracks(3200, spread_db=3.0) * spurts
    sheet = band(resonate(cutting, modes), 402.0, 727)
    sheet = even(wavering(sheet, share=0.01419, rate=22), span_s=0.05)
    spiral = even(band(resonate(cutting, spiral_modes), 326.5, 474), span_s=.08)
    low = even(colour(cutting, rumble_colour))
    body = amp(spiral_db) * drag * spiral + amp(rumble_db) * rumble * low
    grit = shifting(cutting, depth_db=2.5, rate=32, lo_hz=680, hi_hz=2010, count=12)
    grit = even(colour(grit, outline), span_s=.07)
    # flakes splinter at the cutting edge and the blades ring in the same spurts
    flakes = cracks(4000, spread_db=4.0) * spurts
    flakes = shifting(flakes, depth_db=3.5, rate=30, lo_hz=2150, hi_hz=7800, count=20)
    flakes = even(colour(flakes, CHIP_COLOUR))
    blades = even(band(resonate(cracks(5000, spread_db=0.0) * spurts, blade_modes), 2500, 6800))
    crackle = amp(-3.0) * flakes + amp(-3.5) * blades
    caught = stalls()
    # the ice is harder in some places than in others
    hardness = amp(1.1 * walk(30))
    ringing = caught * amp(ring_db) * ring * sheet
    crunching = caught ** .5 * amp(crunch_db) * crunch * grit
    through_ice = ringing + body + crunching
    return hardness * through_ice + hardness ** .5 * amp(chips_db) * chips * crackle


def scene():
    """Everything that happens round the hole, over the quiet of the lake."""
    # resonances of the ice under the microphone, then a little higher with the blades at its surface:
    # [f/Hz, width/Hz, level/dB]
    deep_sheet = [(496.3, 40, -10), (527.7, 23, -1), (559.6, 48.3, -6.5), (628.7, 65, -13)]
    shallow_sheet = [(511, 36, -2), (545, 29.4, 0.5), (615, 49, -11)]
    # crunch of the blades deep in the hole and near the surface: [f/Hz, level/dB]
    deep_crunch = [(400, -26.5), (680, -3), (712, -0.5), (784, -1), (1010, -6), (1130, -14.5), (1250, -4),
                   (1390, -10.5), (1690, -10), (1800, -14), (1970, -23.5), (2300, -32.5), (2990, -60),
                   (5060, -120)]
    shallow_crunch = [(400, -37.5), (680, 9), (701, -3), (770, 3.5), (914, 1), (972, -2.5), (1140, -10.5),
                      (1200, -6), (1250, -3.5), (1390, -11), (1760, -14), (2300, -36), (2990, -67.5),
                      (5060, -120)]
    around = lake_air() + splinters() + boots() + slush() + knocks()
    steel = pull_out() + skid() + first_squeal() + squeaks() + bites()
    deep = drilling(peeling(cranking()), deep_sheet, deep_crunch,
                    ring_db=-0.7, spiral_db=-1.02, rumble_db=-7.0, crunch_db=-1.25, chips_db=-0.97)
    shallow = drilling(starting(), shallow_sheet, shallow_crunch,
                       ring_db=-1.26, spiral_db=-3, rumble_db=-6.5, crunch_db=.7, chips_db=-2.5)
    return (around + steel + deep + shallow)[None]


def record(dry, top_hz=15000):
    """The recorder cuts the top: a steep elliptic low-pass."""
    return signal.sosfilt(signal.ellip(8, .2, 70, top_hz, fs=SR, output="sos"), dry)


dry = scene()
out = record(dry)
generate_wav(out)
```